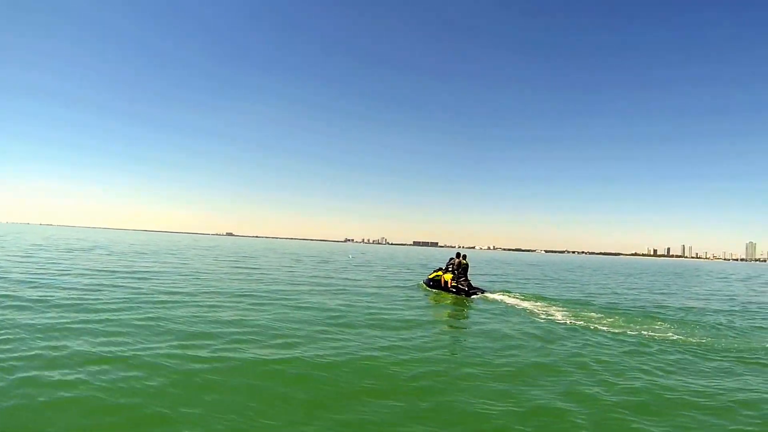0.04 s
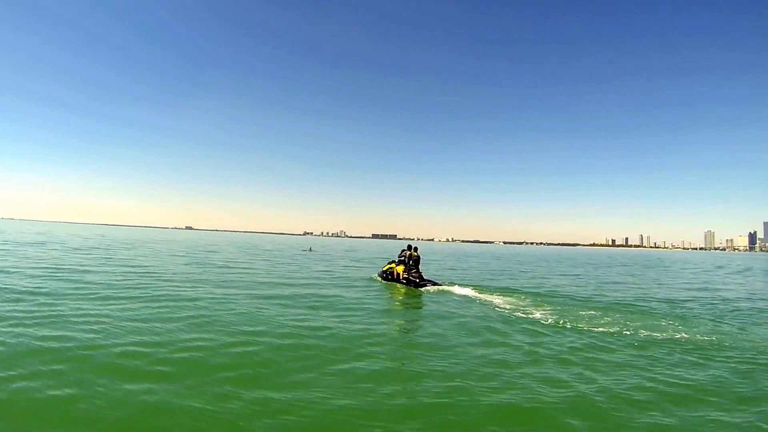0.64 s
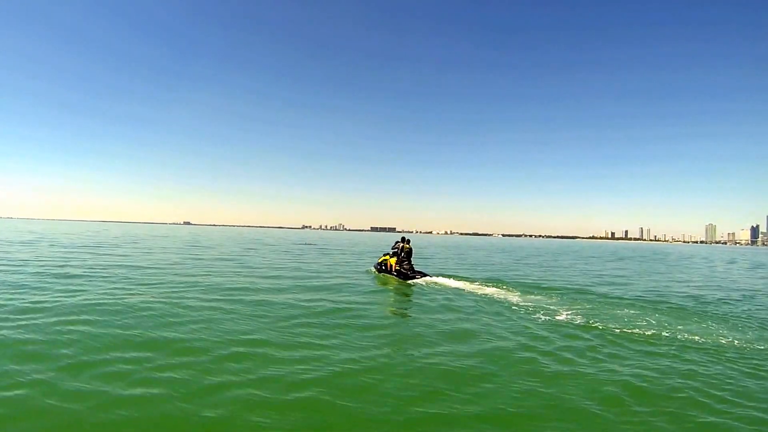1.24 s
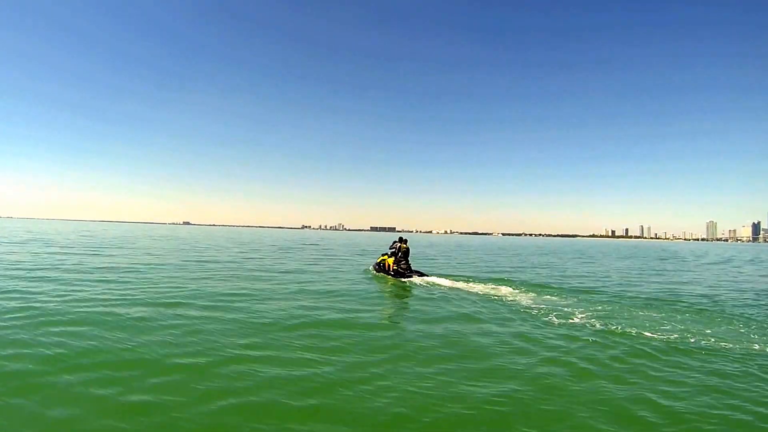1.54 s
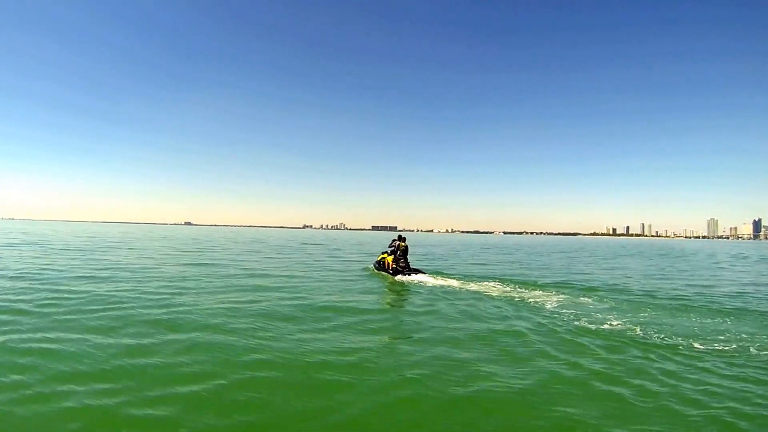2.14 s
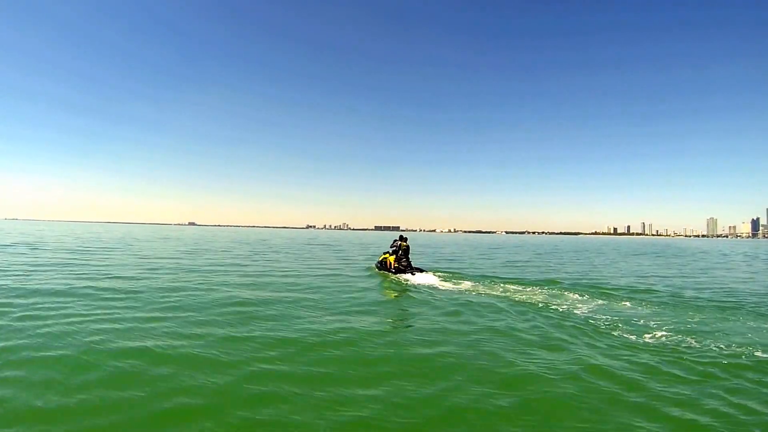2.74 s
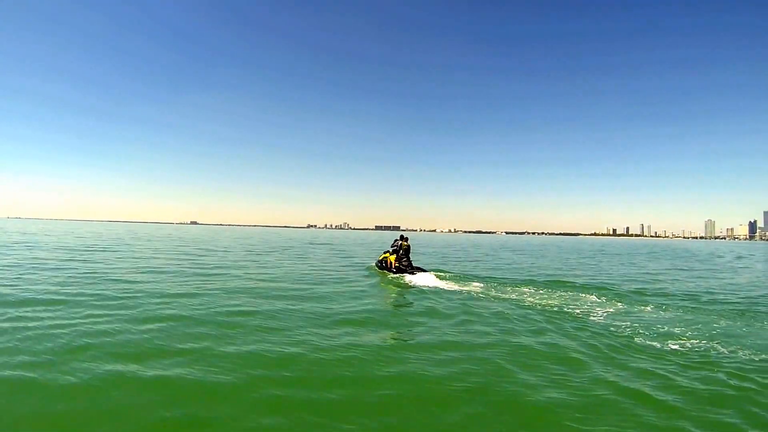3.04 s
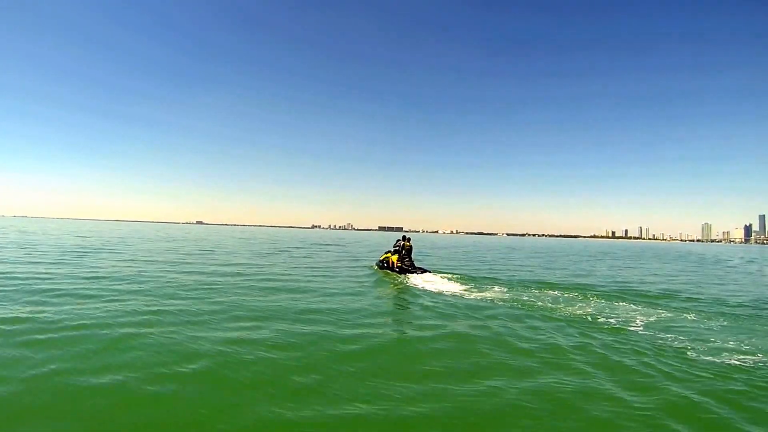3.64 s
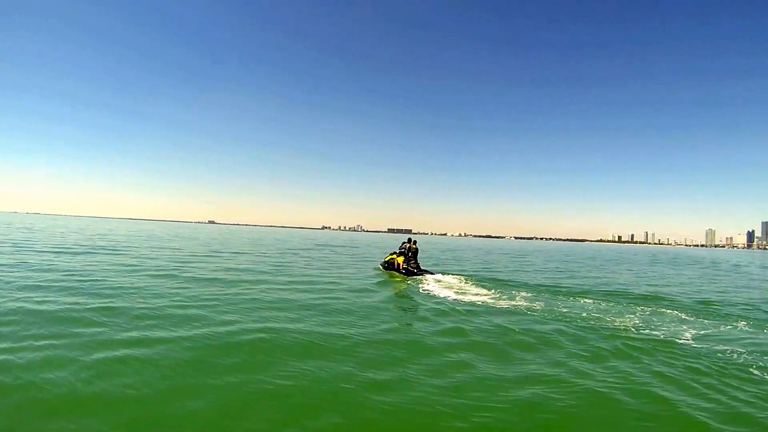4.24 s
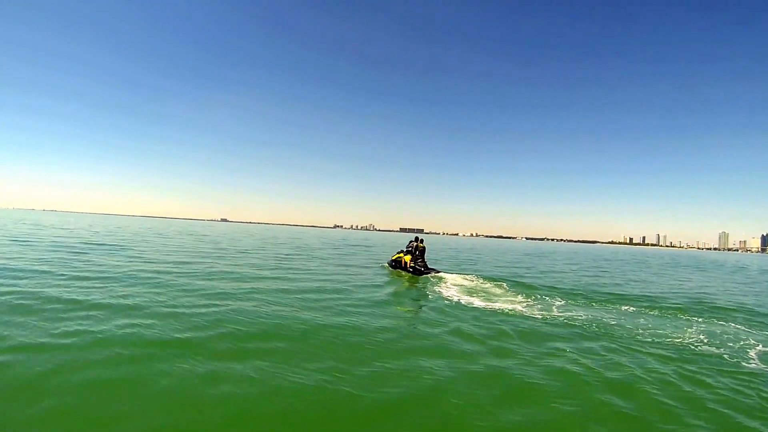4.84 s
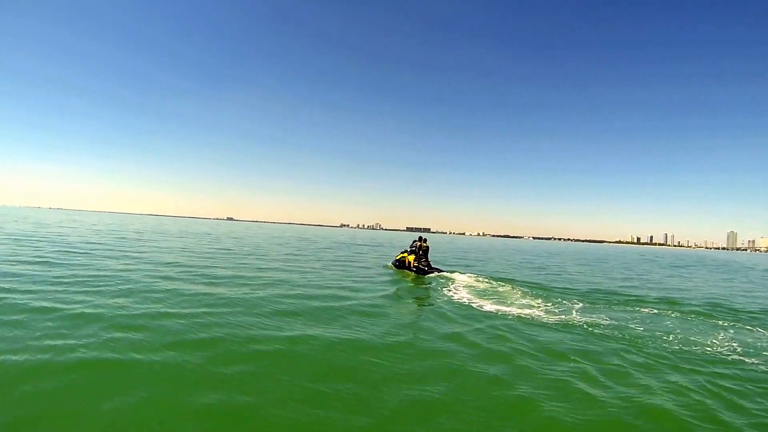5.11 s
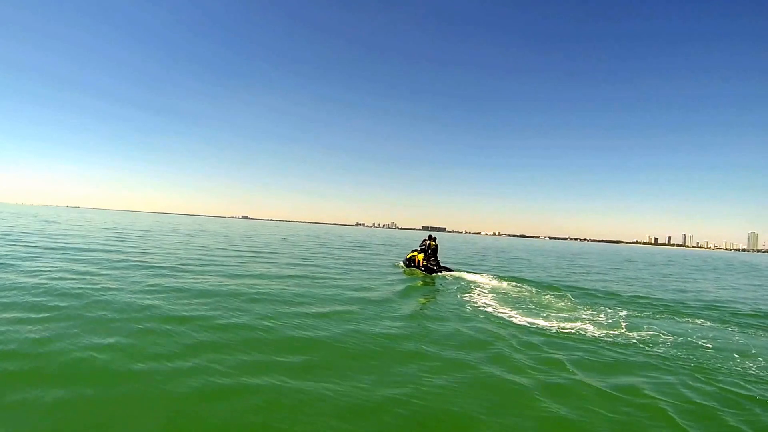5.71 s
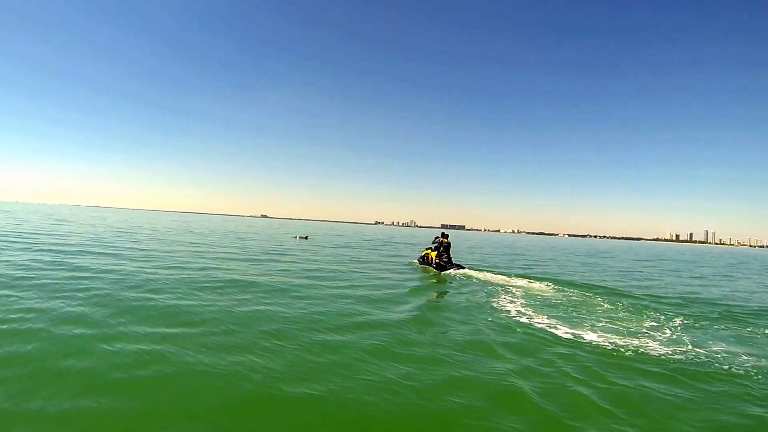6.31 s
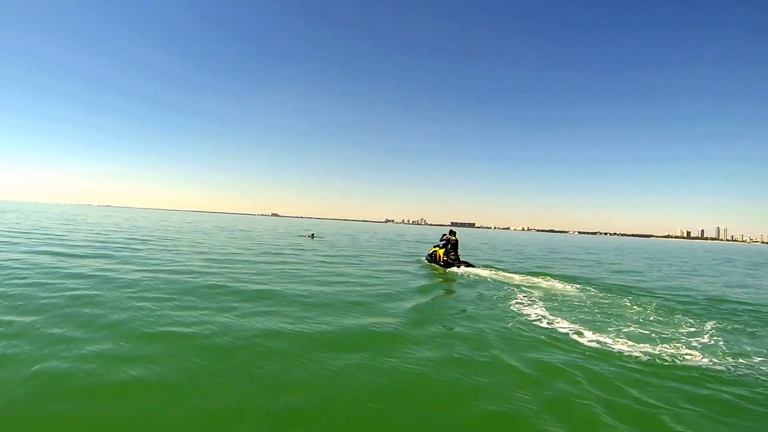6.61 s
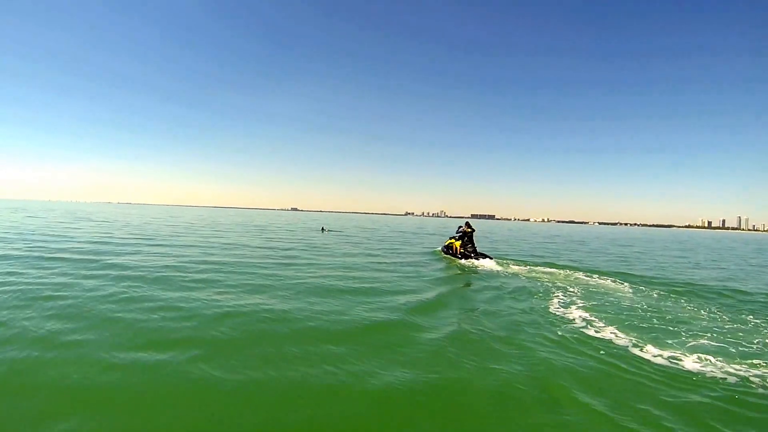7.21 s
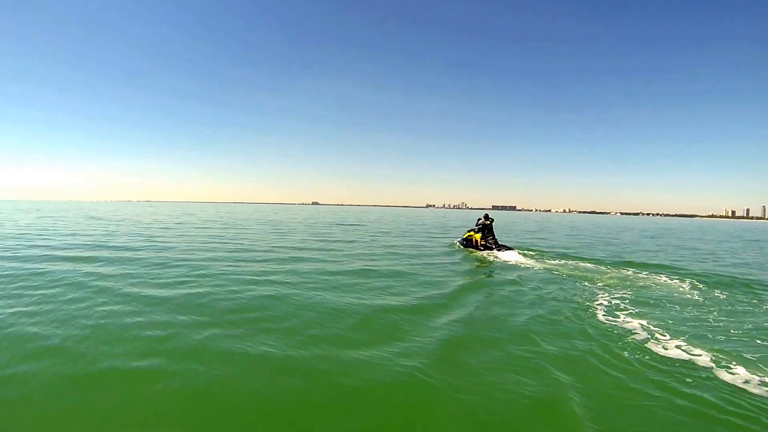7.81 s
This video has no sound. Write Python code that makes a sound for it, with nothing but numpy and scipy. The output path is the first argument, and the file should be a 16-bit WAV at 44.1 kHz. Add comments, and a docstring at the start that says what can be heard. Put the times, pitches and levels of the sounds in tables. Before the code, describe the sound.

A personal watercraft creeps over a calm bay, heard from inside a waterproof camera case. At first its submerged exhaust burbles quietly in low, muffled gulps, about six a second, under a deep wind rumble that eases after a second or so and stays light. At about 1.65 seconds the engine picks up with one dull thump, rising in pitch and growing louder. From 2.5 seconds the gulps quicken to about eight a second. Water sloshes softly and fizzes more strongly along the hull. Short, ringing bubble plops stand out throughout, busiest between 3 and 6 seconds, with the strongest near 4.1 and 7.2 seconds. Scattered drops tick on the case, clustering around 4 seconds. A faint, steady high hiss turns brighter between 3 and 5.5 seconds. Near 7 seconds the engine drops back, its gulps slowing and fading while water and wind continue until 8 seconds.

```python
"""A personal watercraft creeps over a calm bay, heard from inside a waterproof camera case.
At first it idles, its submerged exhaust burbling in slow gulps while light wind rumbles underneath.
Near 1.65 s it picks up with a thump. The gulps grow louder, then quicker, and water fizzes and plops
more strongly along the hull, coloured by the case; drops tick and a steady high hiss turns brighter.
Near 7 s the engine drops back and the gulps slow and fade."""
import sys
import numpy as np
from scipy import signal
from scipy.fft import rfft, irfft, next_fast_len
from scipy.io import wavfile
from scipy.ndimage import map_coordinates

SR = 44100
rng = np.random.default_rng(int(sys.argv[2]) if len(sys.argv) > 2 else 0)


def store_pcm(level_fs):
    """Save levels as 16-bit WAV."""
    pcm = np.round(np.clip(level_fs, -1, 1) * 32767).astype(np.int16)
    wavfile.write(sys.argv[1], SR, np.atleast_2d(pcm).T)


N = 351036

# water flow along the hull, as the level of its wash: t/s, level/dB
HULL_FLOW = [(0, -54.5), (0.8, -53.5), (1.35, -50), (2.1, -49), (2.42, -44.5), (2.75, -52.5), (3.45, -48.5),
             (4.35, -48), (5.1, -47), (6.1, -46.5), (6.4, -49), (7.25, -48), (7.55, -45.5), (7.96, -49.5)]
CRUISE_DB = -48  # that level at cruising flow
# spectrum of sloshing water: f/Hz, relative level/dB
SLOSH_SPECTRUM = [(60, -7.5), (220, 5), (400, -0.5), (620, -3), (800, -5), (950, -13.5), (1500, -9.5),
                  (2500, -56)]


def engine(dispersion_rad=.14, cruise_hz=53, brighten_db_per_hz=0.1441):
    """Periodic excitation: the firing pulses form a harmonic series, which the water muffles."""
    # firing rate: t/s, f/Hz
    firing_rate = [(0, 41.3), (0.8, 42.4), (1.42, 40), (1.64, 48), (1.85, 58), (2.3, 58.6), (2.85, 57.7),
                   (3.1, 53), (4.62, 53), (4.9, 52.8), (5.9, 52.6), (6.12, 53.5), (6.3, 51.3), (6.65, 53.3),
                   (7.05, 46), (7.96, 45.6)]
    # transmission of the exhaust through water: f/Hz, relative level/dB
    muffling = [(45, -15), (55, -7.5), (90, 1.5), (108, -0.5), (160, -5.5), (215, -5.5), (265, -15),
                (320, -19.5), (450, -41), (700, -56)]
    firing_hz = curve(firing_rate)
    phase = 2 * np.pi * np.cumsum(firing_hz * (1 + 0.0051 * wobble(25))) / SR
    harmonics = np.zeros(N)
    for k in range(1, 8):
        lag = dispersion_rad * k * k + 0.13 * k * wobble(18)  # the shifting bubbly path spreads a pulse
        bright_db = brighten_db_per_hz * (k - 2) * (firing_hz - cruise_hz)  # faster firing sharpens it
        level_db = along(muffling, k * firing_hz) + bright_db + 1.42 * wobble(14)
        harmonics -= amp(level_db) * np.cos(k * phase - lag)
    gurgle = unit(noise(muffling) * (1 + 1.1 * np.cos(phase)))  # gas breaking up at each firing
    return gulping() * (amp(0.64) * unit(harmonics) + amp(-13.5) * gurgle)


def gulping(idle_dip_db=10.5, drive_dip_db=5.5, scatter_s=.008, scatter_db=1.0):
    """Amplitude modulation: the exhaust sags between gulps, less so when the gas flows strongly."""
    # exhaust strength at the crests: t/s, level/dB
    crests = [(0, -59), (0.5, -56), (0.92, -51.5), (1.55, -53.5), (1.65, -45), (2.0, -42), (2.35, -45),
              (3.25, -39.5), (4.2, -40), (4.6, -42.5), (4.9, -38), (5.48, -45), (5.68, -41.5), (5.98, -43),
              (6.35, -41.5), (6.76, -43.5), (6.9, -51.5), (7.25, -48), (7.96, -57)]
    # even runs of gulps: first crest t/s, gulp rate f/Hz
    runs = [(0.06, 6.25), (2.47, 7.8), (5.39, 7.8), (6.76, 6.25)]
    ends = [start for start, _ in runs[1:]] + [N / SR + .5]
    beats = [np.arange(start, end - .5 / hz, 1 / hz) for (start, hz), end in zip(runs, ends)]
    gulp_s = np.concatenate(beats)
    late, louder = rng.standard_normal((100, 2))[:len(gulp_s)].T
    gulp_s = np.sort(gulp_s + scatter_s * late)
    t = np.arange(N) / SR
    crest_db = curve(crests) + scatter_db * np.interp(t, gulp_s, louder)
    sag = np.sin(np.pi * np.interp(t, gulp_s, np.arange(len(gulp_s)))) ** 2
    return amp(crest_db - sag * np.interp(crest_db, [-48, -40], [idle_dip_db, drive_dip_db]))


def water():
    """Flow noise: large bubbles wash and small ones fizz under a high hiss, growing with the flow."""
    # share of the brighter hiss colour: t/s, share of power (0-1)
    bright_share = [(0, 0.26), (2.9, 0.3), (5.5, 0.88), (7, 0.88), (7.96, 0.35)]
    # steady high hiss with its resonances shifted up and a 6.5-8 kHz sheen: f/Hz, relative level/dB
    bright_hiss_spectrum = [(2500, -35), (4500, -2.5), (5250, 5), (5800, -3.5), (6500, 1), (7000, -2),
                            (7900, 0.5), (9200, -10.5), (10150, -1), (10700, -6.5), (12000, -13),
                            (14400, -16), (15200, -40)]
    flow_db = curve(HULL_FLOW) - CRUISE_DB + 1.2 * wobble(6)
    large = bubbles(count=2400, low_hz=974, high_hz=1978, decay_cycles=3.35, spread_db=1.5)
    small = bubbles(count=3000, low_hz=2106, high_hz=4230, decay_cycles=5.45, spread_db=2.5)
    tiny = bubbles(count=3500, low_hz=4370, high_hz=13160, decay_cycles=5.0, spread_db=4.5)
    swarm = coloured(foam() + amp(-10.5) * large + amp(-7.5) * small + amp(-4.5) * tiny, case_db)
    bright_hiss = unit(coloured(foam(), lambda hz: along(bright_hiss_spectrum, hz)))
    brightness = curve(bright_share)
    treble = np.sqrt(1 - brightness) * band(swarm, 4150, 14000) + np.sqrt(brightness) * bright_hiss
    wash = amp(CRUISE_DB + flow_db) * band(swarm, 570, 1955)
    fizz = amp(-57 + 0.92 * flow_db) * band(swarm, 1817, 4900)
    hiss = amp(-67.5 + .18 * flow_db) * treble
    churn = amp(0.78 * wobble(22) + 1.03 * wobble(70))
    return churn * (wash + fizz + hiss) + slosh(flow_db)


def bubbles(count, low_hz, high_hz, decay_cycles, spread_db):
    """Bubble resonance: each of a swarm rings as a damped oscillator whose pitch rises."""
    when, pitch, size = rng.random((count, 3)).T[:, :, None]
    hz = low_hz * (high_hz / low_hz) ** pitch
    n = np.arange(SR // 100)
    age = hz * n / SR / decay_cycles  # in decay time constants
    strength = np.sqrt(hz) * amp(-spread_db * np.log(1 - .98 * size))  # a few are much louder
    envelope = np.exp(-age) - np.exp(-5 * age)
    rings = strength * envelope * np.sin(2 * np.pi * decay_cycles * age * (1 + 0.033 * age))
    samples = (when * N).astype(int) + n
    return unit(np.bincount(samples.ravel(), rings.ravel(), N)[:N])


def foam():
    """Broadband noise: dense clicks, as of breaking foam, on a bed of hiss."""
    return crackle(count=9000, spread_db=3.0) + amp(-3.0) * rng.standard_normal(N)


def slosh(flow_db, slap_half_s=0.036):
    """Modulated noise: a dull slosh follows the flow and swells as wavelets slap the hull."""
    # wavelets: crest t/s, level/dB above the steady slosh
    wavelets = [(0.81, 6), (2.45, 2.5), (3.57, 3.5), (4.38, 6)]
    t = np.arange(N) / SR
    slap_db = sum(db * np.exp(-((t - s) / slap_half_s) ** 2) for s, db in wavelets)
    return amp(-56.5 + 0.23 * flow_db + slap_db + 1.65 * wobble(30)) * noise(SLOSH_SPECTRUM)


def plops(t60_cycles=23, attack_s=0.00036):
    """Free decay: single bubbles ring at their natural frequencies, heard through the case."""
    # the biggest bubbles bursting nearby, and one knock ringing near 1.2 kHz at 3.04 s: t/s, level/dB, f/Hz
    big_bubbles = [(0.309, -32.5, 1340), (0.389, -37, 3020), (0.801, -33, 3020), (1.053, -32.5, 1440),
                   (1.422, -35.5, 2460), (1.496, -29.5, 3110), (1.781, -28, 1530), (2.02, -27, 1410),
                   (2.083, -30, 1293), (2.95, -29, 3050), (3.039, -26.5, 1220), (3.295, -27.5, 1470),
                   (3.43, -25.5, 1560), (3.453, -28, 1467), (3.638, -29, 1460), (3.783, -30, 1425),
                   (4.032, -29.5, 1473), (4.107, -23, 1470), (4.213, -30.5, 2927), (4.5, -30, 1467),
                   (4.654, -28.5, 1528), (4.672, -30, 3119), (5.337, -25, 1563), (5.338, -29.5, 2340),
                   (5.494, -26, 1564), (5.772, -27.5, 1489), (5.804, -28, 1430), (5.85, -27.5, 2630),
                   (6.001, -31, 3220), (6.496, -32.5, 3057), (6.588, -28.5, 1510), (6.669, -32, 2656),
                   (7.165, -22, 1570), (7.561, -27, 1417)]
    out, t = np.zeros(N), np.arange(SR // 20) / SR
    for s, db, hz in list(big_bubbles) + stray_bubbles(per_size=18):
        envelope = amp(-60 * t * hz / t60_cycles) * (1 - np.exp(-t / attack_s))
        strength = amp(db + 1.0 - case_db(hz))  # offsets the gain of the case at this pitch
        add(out, s, strength * envelope * np.sin(2 * np.pi * hz * t))
    return coloured(out, case_db)


def stray_bubbles(per_size, scatter_db=1.5):
    """Random arrivals: lesser bubbles, louder in a stronger flow, as rows of t/s, level/dB, f/Hz."""
    # two sizes: lowest f/Hz, highest f/Hz, level/dB at cruising flow, growth/(dB per dB of flow)
    sizes = [(1305, 1605, -34, .5), (2440, 3320, -35.5, 0.6)]
    rows = []
    for low_hz, high_hz, db, growth in sizes:
        when, pitch = rng.random((per_size, 2)).T
        s = when * N / SR
        flow_db = np.interp(s, *np.transpose(HULL_FLOW)) - CRUISE_DB
        level_db = db + growth * flow_db + scatter_db * rng.standard_normal(per_size)
        rows += zip(s, level_db, low_hz + (high_hz - low_hz) * pitch)
    return rows


def case_db(hz):
    """Transmission through a wall: the case's gain in dB is a broad slope with resonance peaks."""
    # slope of water sound through the wall: f/Hz, level/dB
    slope = [(200, -16), (600, -3), (950, -1), (2100, 1), (3700, -0.5), (4400, -11.5), (6500, -18),
             (8500, -21.5), (11500, -19.5), (13000, -29), (14500, -23), (15200, -58)]
    # case resonances: f/Hz, width/Hz, level/dB above the slope
    resonances = [(1316.5, 227, 16), (1600.6, 169, 15), (2310, 71, 6), (2592, 172, 7.5), (3074, 334, 10),
                  (5097, 175, 11), (5820, 240, 9), (9380, 270, 9.5), (10230, 620, 8)]
    return along(slope, hz) + sum(db * np.exp(-((hz - f) / width) ** 2) for f, width, db in resonances)


def spray(light_drops=20, tick_t60_s=.009):
    """Impact noise: single drops tick on the case; splashes are short showers of finer ones."""
    # the heaviest drops: t/s, relative level/dB
    heavy_drops = [(0.09, -39.5), (0.698, -45), (0.718, -38), (1.655, -38), (2.951, -40), (3.757, -43.5),
                   (3.910, -40.5), (4.109, -41), (4.143, -40.5), (5.005, -40), (7.936, -37.5)]
    # splashes: crest t/s, relative level/dB, half length/s
    splashes = [(3.447, -59.5, .018), (3.892, -58, .016), (4.104, -58.5, .016), (7.5, -59.5, .018)]
    # response of the case to drops: f/Hz, level/dB
    spatter = [(500, -9), (3000, 4), (5500, 6.5), (8500, -2), (11000, -7.5), (14000, -19), (15200, -29)]
    out, t = np.zeros(N), np.arange(N) / SR
    tick = amp(-5.5 - 60 * t[:SR // 50] / tick_t60_s)
    drizzle = zip(rng.random(light_drops) * N / SR, -53 + 6 * rng.standard_normal(light_drops))
    for s, db in [*heavy_drops, *drizzle]:
        add(out, s, amp(db) * tick * rng.standard_normal(len(tick)))
    showers = sum(amp(db - 8.0 * ((t - s) / half_s) ** 2) for s, db, half_s in splashes)
    out += showers * crackle(count=30000, spread_db=4.5)
    return coloured(out, lambda hz: along(spatter, hz))


def thump(attack_s=0.0013, slap_t60_s=.05):
    """Modal ringing: one dull knock excites the damped modes of the hull and slaps the water."""
    # the knock: t/s, level/dB
    knock = (1.653, -44)
    # hull modes: f/Hz, relative level/dB, T60/s
    hull_modes = [(182, 4.5, 0.11), (284, 3.5, 0.11), (465, -0.5, 0.14), (610, 3.5, 0.044),
                  (2520, 3, 0.033)]
    out, t = np.zeros(N), np.arange(SR // 4) / SR
    s, db = knock
    ring = sum(amp(level - 60 * t / t60) * np.sin(2 * np.pi * hz * t) for hz, level, t60 in hull_modes)
    slap = amp(2 - 60 * t / slap_t60_s) * noise(SLOSH_SPECTRUM)[:len(t)]
    add(out, s, amp(db) * (ring + slap) * (1 - np.exp(-t / attack_s)))
    return out


def wind(gust_db=2, gusts_per_s=5.5):
    """Turbulent pressure: slow eddies press on the case as a low rumble."""
    # an early gust dropping to a light breeze: t/s, level/dB
    strength = [(0, -34), (1.1, -35), (1.6, -39.5), (2.1, -38.5), (3.9, -38.5), (4.4, -42), (5.2, -42),
                (5.7, -38.5), (7.96, -37.5)]
    # spectrum of the buffeting: f/Hz, relative level/dB
    buffeting = [(4, -11.5), (12, -2.5), (22, 2.5), (32, -8), (45, -20.5), (70, -30), (130, -29),
                 (300, -69), (800, -100)]
    return amp(curve(strength) + gust_db * wobble(gusts_per_s)) * noise(buffeting)


def crackle(count, spread_db):
    """Shot noise: sharp clicks of random time, sign and size, at rms 1."""
    when, size, sign = rng.random((count, 3)).T
    clicks = np.sign(sign - .5) * amp(-spread_db * np.log(1 - .99 * size))
    return unit(np.bincount((when * N).astype(int), clicks, N))


def noise(spectrum):
    """Spectral shaping: white noise filtered to the given spectrum, at rms 1."""
    return unit(coloured(rng.standard_normal(N), lambda hz: along(spectrum, hz)))


def coloured(x, gain_db):
    """Minimum-phase filtering of x by gain_db(f/Hz)."""
    m = 2 * next_fast_len(N // 2 + SR // 4)
    gain = amp(gain_db(np.fft.rfftfreq(m, 1 / SR)))
    cepstrum = irfft(np.log(gain + 1e-6), m)
    cepstrum[1:m // 2] *= 2  # folding onto positive time makes the filter causal
    cepstrum[m // 2 + 1:] = 0
    return irfft(rfft(x, m) * np.exp(rfft(cepstrum)), m)[:N]


def band(x, low_hz, high_hz):
    """Zero-phase band-pass filtering, at rms 1."""
    sections = signal.butter(4, [low_hz, high_hz], btype="band", fs=SR, output="sos")
    return unit(signal.sosfiltfilt(sections, x))


def wobble(knots_per_s):
    """Random modulation: a smooth curve through Gaussian knots."""
    coarse = np.arange(0, N, SR // 1000)
    knots = rng.standard_normal(int(N * knots_per_s / SR) + 4)
    return np.interp(np.arange(N), coarse, map_coordinates(knots, [coarse * knots_per_s / SR]))


def curve(points):
    """Linear interpolation of (t/s, value) points to every sample."""
    return np.interp(np.arange(N) / SR, *np.transpose(points))


def along(points, hz):
    """Interpolation of (f/Hz, level/dB) points on a log frequency axis."""
    f, db = np.transpose(points)
    return np.interp(np.log(hz + 1), np.log(f + 1), db)


def add(track, s, sound):
    """Superposition of a sound on the track from s seconds on."""
    span = track[max(round(s * SR), 0):][:len(sound)]
    span += sound[:len(span)]


def amp(db):
    """Amplitude ratio of a level in dB."""
    return 10 ** (np.asarray(db) / 20)


def unit(x):
    """Normalisation to rms 1."""
    return x / np.sqrt(np.mean(x ** 2) + 1e-20)


def scene():
    """Superposition: the pressures of all sources add at one microphone."""
    return (engine() + water() + plops() + spray() + thump() + wind())[None]


def record(dry, top_hz=15100):
    """Band limiting: the camera passes nothing above top_hz."""
    m = next_fast_len(N + SR // 2)
    passband = np.fft.rfftfreq(m, 1 / SR) < top_hz
    return irfft(rfft(dry, m) * passband, m)[:, :N]


dry = scene()
out = record(dry)
store_pcm(out)
```